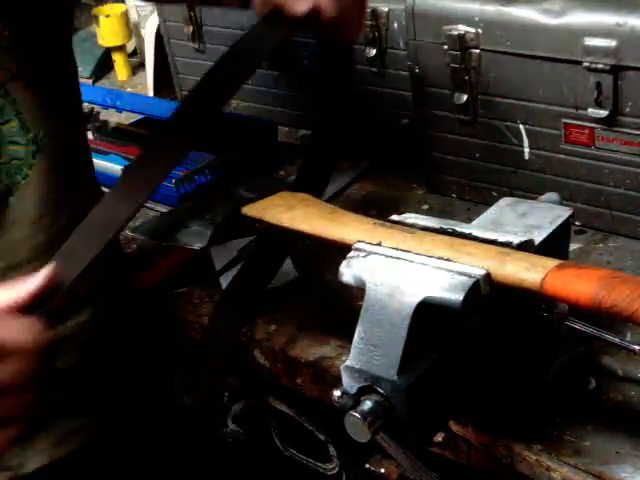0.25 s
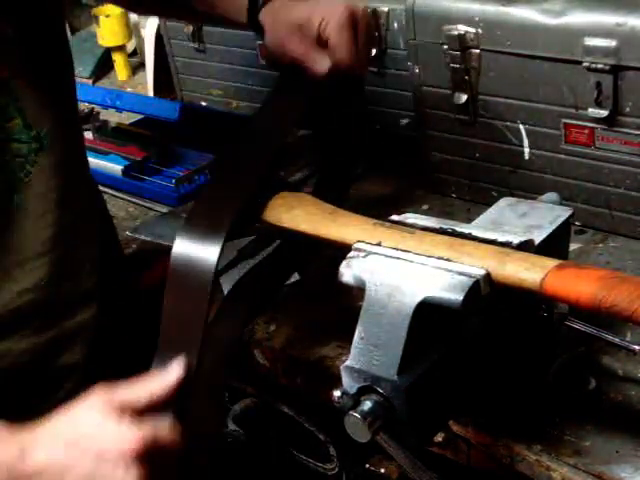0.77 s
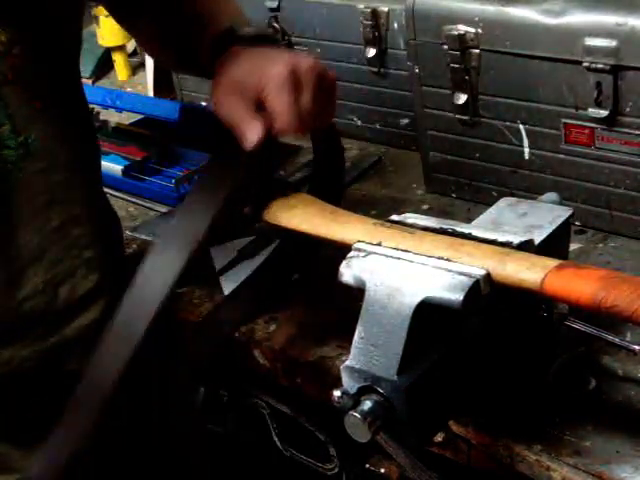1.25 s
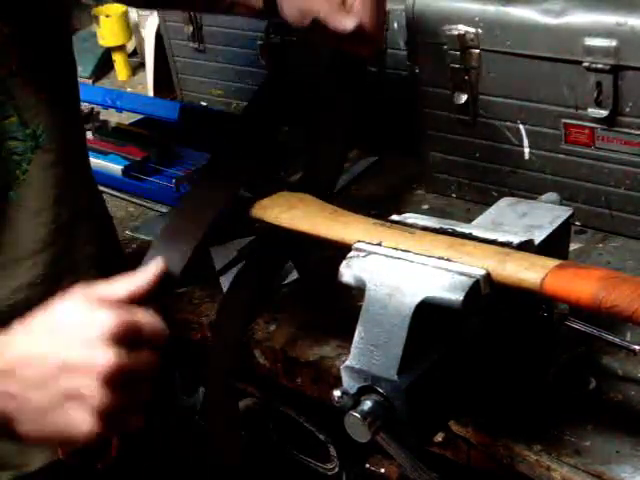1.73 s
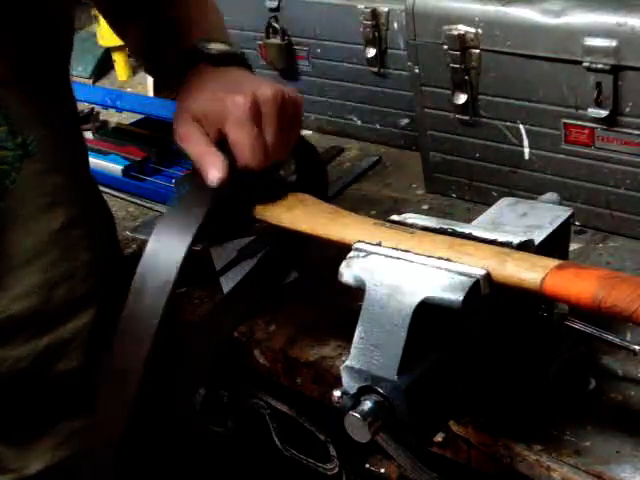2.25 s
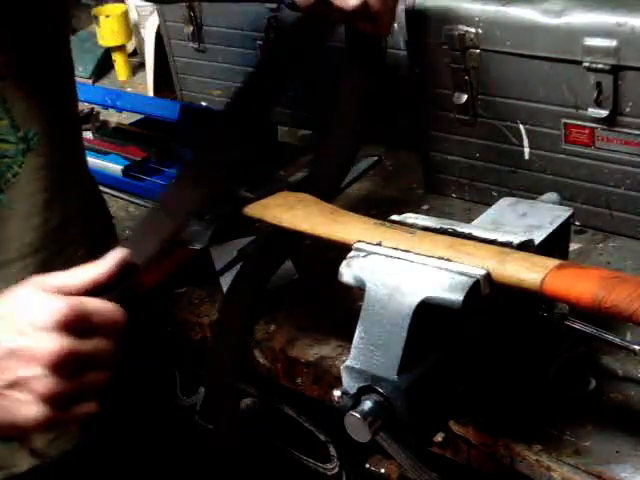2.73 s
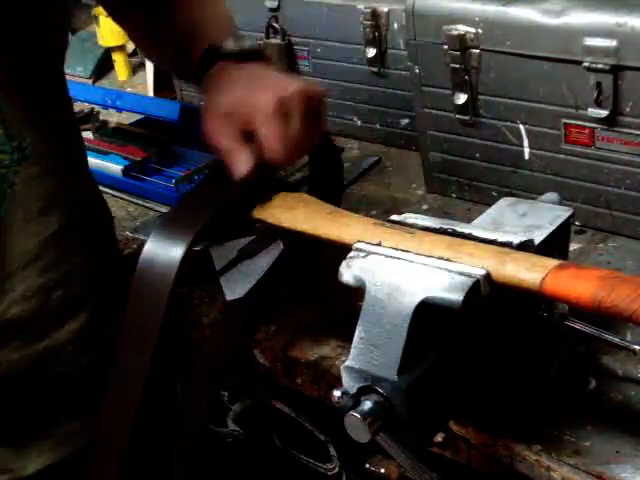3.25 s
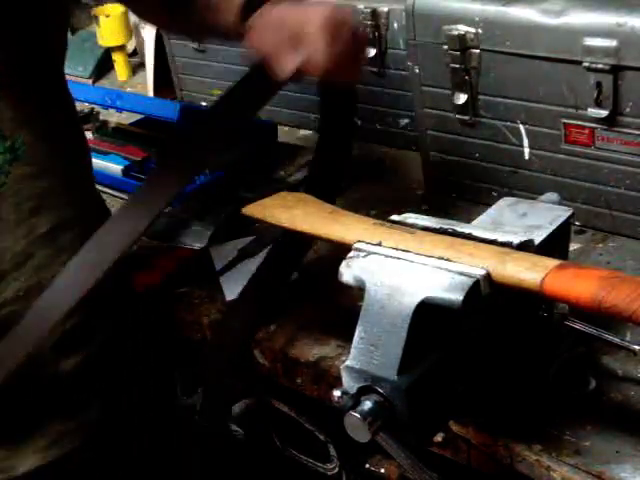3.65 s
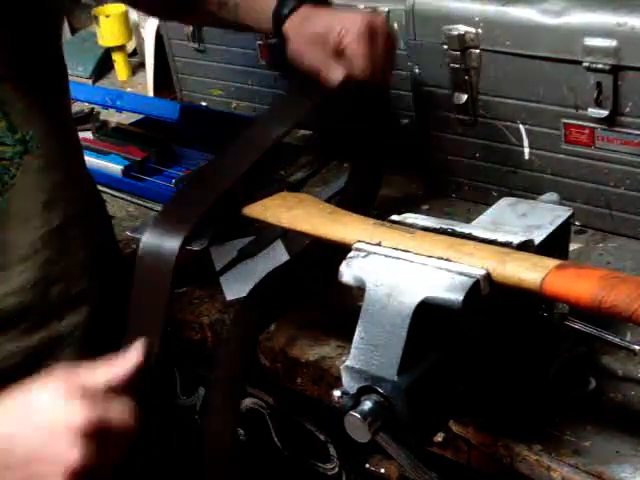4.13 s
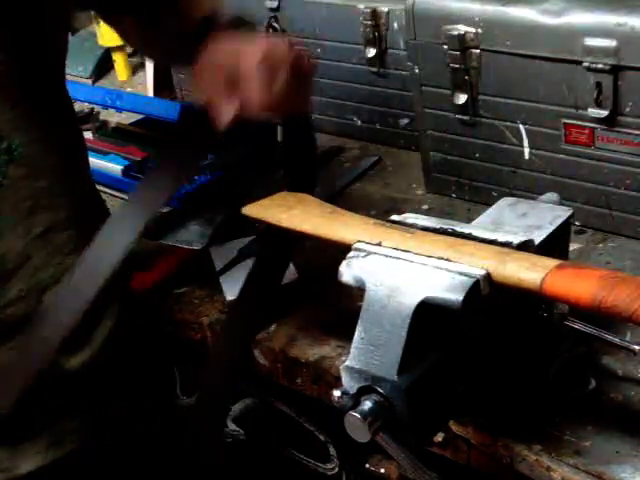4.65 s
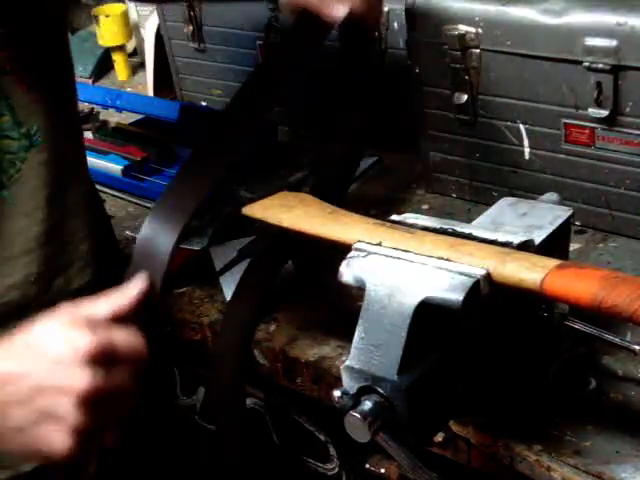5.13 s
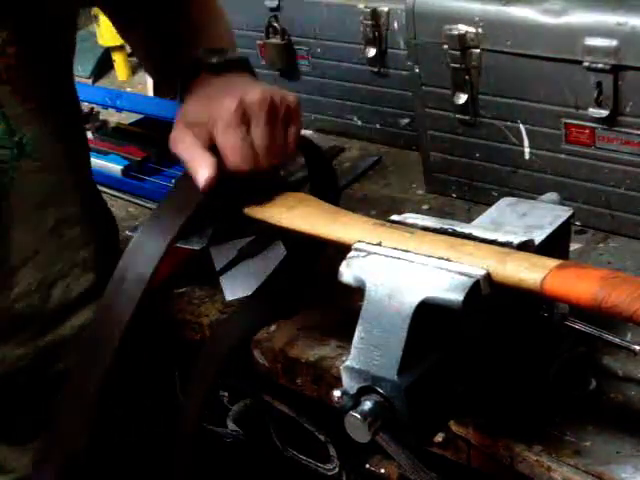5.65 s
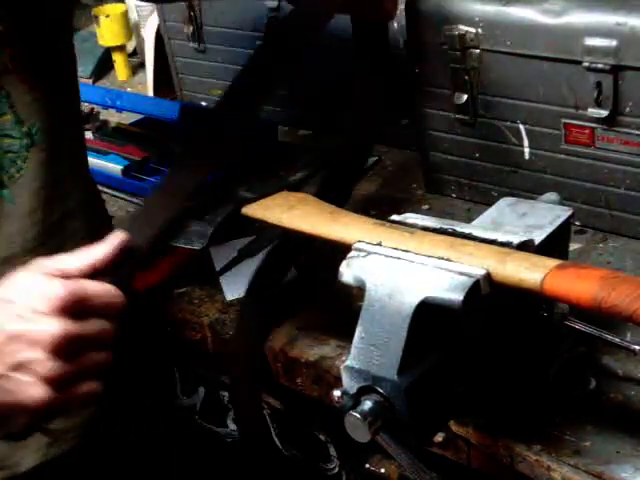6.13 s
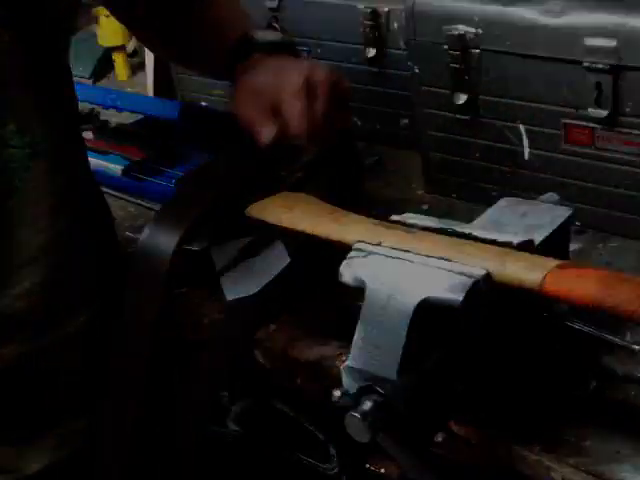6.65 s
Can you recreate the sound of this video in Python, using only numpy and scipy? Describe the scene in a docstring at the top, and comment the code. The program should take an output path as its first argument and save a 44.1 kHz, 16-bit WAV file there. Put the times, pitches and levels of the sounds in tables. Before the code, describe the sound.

A leather belt rubs across a steel axe head held in a vice, close and dry in a quiet workshop. One stroke is under way at the start, and more follow at about 0.8, 1.9, 3.1, 4.2, 5.3 and 6.5 seconds. Each is a half-second hissing rasp with a faint metallic ring. Between pulls the belt slides back with softer, broken rubbing and scuffs, the strongest near 5 seconds. It snaps taut with sharp clicks at about 1.7, 1.8, 2.9, 3.9, 5.0 and 6.1 seconds, the one at 3.9 the sharpest. Short, light knocks on the head come just before the pulls, with a very faint low shudder from the bench. A tiny hollow creak at 6.4 seconds leads into the last stroke. Underneath lie soft room noise, a faint fading hum and barely audible low tones that come and go.

```python
"""A leather belt is drawn over an axe head clamped in a bench vice, in a quiet workshop.
On each pull tiny slips of the grain scrape the steel into ringing. Between pulls the belt
slides back, scuffs, snaps taut and knocks the head, which shakes the bench. A short creak
precedes the last pull. A faint hum fades under the room noise; low drones come and go."""
import sys
import numpy as np
from scipy import signal
from scipy.fft import rfft, irfft
from scipy.io import wavfile

SR = 44100
rng = np.random.default_rng(int(sys.argv[2]) if len(sys.argv) > 2 else 0)


def store_wav(level_fs):
    """Save 16-bit WAV to argv[1]."""
    pcm = np.round(np.clip(np.atleast_2d(level_fs), -1, 1) * 32767)
    wavfile.write(sys.argv[1], SR, pcm.T.astype(np.int16))


N = 303408


def gain_of(db):
    return 10 ** (np.asarray(db) / 20)


def unit_rms(x):
    return x / np.sqrt(np.mean(x ** 2) + 1e-20)


def coloured(x, spectrum):
    """x shaped by (f/Hz, level/dB) points on a log frequency axis, at rms 1."""
    hz, db = np.transpose(spectrum)
    bin_db = np.interp(np.log(np.fft.rfftfreq(len(x), 1 / SR) + 1), np.log(hz + 1), db)
    return unit_rms(irfft(rfft(x) * gain_of(bin_db), len(x)))


def resonate(x, hz, width_hz):
    """One-pole resonance at hz."""
    radius = np.exp(-np.pi * width_hz / SR)
    return 2 * signal.lfilter([1 - radius], [1, -radius * np.exp(2j * np.pi * hz / SR)], x).real


def wander(knots_per_s):
    """Random drift, rms about 1."""
    knots = rng.standard_normal(2000)
    return 1.22 * np.interp(np.arange(N) / SR * knots_per_s, np.arange(2000), knots)


def add(mix, start_s, sound):
    part = mix[round(start_s * SR):][:len(sound)]
    part += sound[:len(part)]


def contact(t, marks_s, levels_db, lift_s):
    """Stroke envelope: rises to the first mark, follows the levels, decays as the belt lifts off."""
    rise = np.clip(t / marks_s[0], 0, 1) ** 0.84
    lift_off = np.exp(-np.maximum(t - marks_s[-1], 0) / lift_s)
    return rise * gain_of(np.interp(t, marks_s, levels_db)) * lift_off


# Taut belt: start/s, bite/s, peak/s, length/s, scrape at bite/dB, at peak/dB, at parting/dB,
# handle/dB, handle change/dB, hiss/dB, ring/dB, ring tilt/(dB/octave); handle, hiss, ring re scrape
PULLS = [(-.45, .1, 0.41, 0.6, -36, -30.5, -44.5, -8, 6, -9, -4, 7),
         (0.758, 0.084, 0.24, 0.52, -36.5, -34, -37.5, -5.5, -2, -16, -5, -2),
         (1.918, 0.13, 0.43, 0.51, -37.5, -32, -35, -11, -10.5, -17, -6, 0),
         (3.055, 0.1, 0.34, 0.51, -34.5, -30.5, -38, -12.5, -7.5, -15.5, -5.5, -0.5),
         (4.155, 0.091, 0.27, 0.52, -36.5, -29, -33, -13, -8.5, -15.5, -8, 1.5),
         (5.284, 0.19, 0.37, 0.49, -32.5, -29, -34, -13.5, -12, -15, -9.5, -0.1),
         (6.456, .11, 0.24, 0.4, -34, -30, -35.5, -13.5, -6.5, -15.5, -10, 3)]
# Slack belt: start/s, rise/s, hold/s, first level/dB, last level/dB, handle/dB, hiss/dB (both re scrape)
SLIDES = [(0.157, 0.047, 0.038, -47.5, -51, -3, -6.5), (0.25, 0.017, 0.11, -56, -61, -2, -6),
          (0.367, 0.084, .11, -44.5, -49, -5.5, -5.5), (0.587, 0.02, 0.038, -48, -49.5, -8, -4.5),
          (1.36, 0.019, .015, -53, -58, 3, -7), (1.568, .008, 0.14, -48.5, -46, -1.9, -15),
          (1.704, 0.014, 0.021, -54, -42.5, -7, -9), (2.496, .02, 0.058, -57.5, -62, 3, -1),
          (2.614, .01, 0.017, -51.5, -64, -2, -8), (2.69, 0.07, .11, -47.5, -45.5, -3.5, -6.5),
          (2.887, 0.013, 0.085, -44.5, -52, -3.5, -7.5), (2.992, .015, 0.053, -52.5, -57, 0, -5.5),
          (3.629, 0.016, 0.031, -45, -46.5, -5.5, -14), (3.863, .01, 0.021, -49, -44, 5, -17),
          (3.918, 0.01, 0.15, -39.5, -50, 0, -4.5), (4.093, 0.017, 0.027, -57, -50, 2, -10),
          (4.713, 0.012, 0.057, -52, -51, 1, -15), (4.824, 0.0089, 0.0092, -49, -62, -0.5, -15),
          (4.861, 0.033, .01, -49, -49, 2.4, -8), (5.04, 0.013, 0.17, -51.5, -52.5, 2.5, -1.5),
          (5.252, .01, 0.026, -55, -57, -9, -5), (5.846, 0.052, 0.051, -40.5, -40.5, -8.5, -14),
          (6.011, 0.043, .015, -47, -44.5, -4.5, -17), (6.157, 0.008, .1, -48, -53, 2.7, -4.5),
          (6.316, 0.035, .015, -52, -51, -7, -8), (6.388, .015, .05, -59, -58, -3, -6)]


def strokes():
    """Pulls and slides set the drive of scrape, handle, hiss and ring, and the tilt of the ring."""
    t = np.arange(0, N / SR, 0.001)
    drive, tilt = np.zeros((4, len(t))), np.zeros(len(t))
    pull_lift_s, slide_lift_s = 0.032, 0.014
    hiss_change_db, ring_change_db, slide_ring_db = -4.1, -4, -10.5
    for start, bite, peak, length, *scrape_db, handle_db, change_db, hiss_db, ring_db, tilt_db in PULLS:
        force = contact(t - start, [bite, peak, length], scrape_db, pull_lift_s)
        along = np.clip((t - start) / length, 0, 1) - 0.5  # contact position on the belt
        drive += force * gain_of([np.zeros(len(t)),
                                  handle_db + change_db * along,
                                  hiss_db + hiss_change_db * along,
                                  ring_db + ring_change_db * along])
        tilt[(t > start) & (t < start + length + 4 * pull_lift_s)] = tilt_db
    for start, rise, hold, first_db, last_db, handle_db, hiss_db in SLIDES:
        force = contact(t - start, [rise, rise + hold], [first_db, last_db], slide_lift_s)
        drive += force * gain_of([[0], [handle_db], [hiss_db], [slide_ring_db]])
    return [np.interp(np.arange(N) / SR, t, row) for row in (*drive, tilt)]


def grain_slips():
    """Tiny slips of the leather grain: dense clicks of uneven size, in clumps."""
    size = gain_of(1.53 * np.minimum(rng.exponential(1, N), 6))
    return unit_rms(rng.standard_normal(N) * size * gain_of(0.87 * wander(74)))


# Rubbed axe head: f/Hz, nominal width/Hz, relative level/dB
STEEL_MODES = [(792, 78, -9.5), (1045, 100, -5), (1330, 37, -16), (1577, 40, -16.5), (1780, 180, -9.5),
               (2037, 60, -14), (2235, 85, -16.5), (2532, 60, -1), (2660, 94, -7), (2820, 41, -16.5),
               (2957, 120, -2), (3184, 91, 1), (3360, 62, -6.5), (3450, 58, -5.5), (4226, 200, -3.5),
               (4700, 72, -4), (4854, 45, -7.5), (5265, 110, -9.5)]


def steel_ring(slips, tilt_db_per_octave):
    """Slips ring the head; the contact wanders along the edge, so each mode's drive varies."""
    ring = np.zeros(N)
    for hz, width_hz, db in STEEL_MODES:
        level_db = db + 2.8 * wander(16) + 1.7 * wander(2.68) + tilt_db_per_octave * np.log2(hz / 2500)
        mode = resonate(resonate(slips, hz, 0.98 * width_hz), hz, 4.9 * width_hz)
        ring += gain_of(level_db) * unit_rms(mode)
    return ring / np.linalg.norm([gain_of(db) for _, _, db in STEEL_MODES])


# Rubbing spectra of edge, handle and airy hiss: f/Hz, relative density/dB
EDGE_SPECTRUM = [(530, -61.5), (900, -36), (1050, -14.5), (1220, -9), (1830, -1.5), (2200, -1.5),
                 (2540, 3.5), (3320, 4.5), (3710, 3.5), (7000, -14), (9100, -19), (15400, -120)]
HANDLE_SPECTRUM = [(88, -39), (150, -42), (193, -15.5), (386, -15), (447, -6), (706, -7), (825, 1),
                   (1060, -4), (1210, -5.5), (1800, -9), (2340, -16), (3960, -120)]
HISS_SPECTRUM = [(2650, -48), (4500, -18), (4810, -4.5), (5060, -13.5), (5430, -6), (7230, -6),
                 (9420, -3.5), (10000, -10.5), (13000, -38), (22000, -120)]


def belt():
    """The same slips sound through edge, handle and air, and ring the steel."""
    scrape_drive, handle_drive, hiss_drive, ring_drive, tilt = strokes()
    slips = grain_slips()
    firmness = np.minimum(scrape_drive / gain_of(-36), 1) ** 0.62  # a light touch hardly rings the steel
    ring = ring_drive * firmness * steel_ring(slips, tilt)
    edge = scrape_drive * gain_of(-2.5 + 1.03 * wander(15)) * coloured(slips, EDGE_SPECTRUM)
    hiss = hiss_drive * gain_of(1.36 * wander(40)) * coloured(slips, HISS_SPECTRUM)
    handle = handle_drive * gain_of(1.05 * wander(25)) * coloured(slips, HANDLE_SPECTRUM)
    return edge + ring + handle + hiss


# Workshop background: f/Hz, relative density/dB
ROOM_SPECTRUM = [(15, -45), (25, -18.5), (53, -15.5), (97, -7), (168, -7.5), (447, -4), (667, -2),
                 (836, -3.5), (924, -6.5), (1730, -8.5), (2400, -11), (3160, -8), (3670, -11), (8820, -15),
                 (10000, -17), (13000, -47), (22000, -120)]


def room_noise(level_db=-52.5):
    """Broad noise that swells slightly."""
    return gain_of(level_db + 2.3 * wander(4.3)) * coloured(rng.standard_normal(N), ROOM_SPECTRUM)


# Course of the hum: t/s, level/dB, f/Hz
HUM_TRACK = [(0.0, -63, 101.9), (0.55, -63.5, 102.1), (1.66, -63, 102.9), (1.9, -62.5, 109.3),
             (2.03, -69, 104.3), (2.63, -75, 98), (2.78, -70, 106.6), (4.66, -73, 103), (6.44, -71, 123),
             (6.88, -78, 117)]


def hum():
    """A fading low tone that wavers in pitch and level."""
    t = np.arange(N) / SR
    marks_s, db, hz = np.transpose(HUM_TRACK)
    pitch_hz = np.interp(t, marks_s, hz) + 1.25 * wander(13)
    tone = np.sqrt(2) * np.sin(2 * np.pi * np.cumsum(pitch_hz) / SR)
    return gain_of(np.interp(t, marks_s, db) + 4.4 * wander(10)) * tone


# Faint tones: start/s, end/s, f/Hz, level/dB
DRONES = [(0, .5, 118.3, -62.5), (.82, 1.352, 134.6, -63), (1.85, 2.3, 139, -73), (4.2, 4.698, 138, -66.5),
          (5.6, 6.05, 138.4, -65), (5.82, 6.85, 216.4, -63)]


def drones():
    """Brief steady tones that fade in and out."""
    out = np.zeros(N)
    for start, end, hz, db in DRONES:
        t = np.arange(round((end - start) * SR)) / SR
        add(out, start, gain_of(db) * signal.windows.tukey(len(t), 0.4) * np.sin(2 * np.pi * hz * t))
    return out


# Struck head and handle: f/Hz, relative level/dB, nominal T60/s
KNOCK_MODES = [(298, -22, 0.094), (464, -17, 0.066), (795, -7, 0.15), (868, -2.5, .05),
               (1140, -10.5, 0.048), (1167, -9, 0.058), (1256, -6.5, 0.046), (1520, -7, 0.036),
               (1783, 2.5, 0.037), (1874, -0.5, 0.016), (2090, -3, 0.027), (2610, -8, 0.029),
               (2830, -5, 0.031), (3240, -3.5, 0.1), (3685, -4, 0.042)]
# Blows on the head: t/s, level/dB, tilt/(dB/kHz), pitch factor, T60 factor, smear/s
KNOCKS = [(0.2838, -27.5, -6.5, 0.95, 0.45, 0.00077), (.7028, -23, -5.5, 1.07, 0.37, 0.012),
          (1.866, -23.5, -5.5, .99, 0.5, 0.0061), (2.981, -19, -10.5, 1.02, 0.7, 0.0039),
          (3.891, -32.5, 1.5, 1.08, 1.3, 0.013), (4.076, -27.5, -5.5, 1.11, 0.42, 0.0054),
          (4.901, -25, -2, 0.87, 0.3, 0.002), (5.221, -25.5, -5, 1.01, 0.63, .011),
          (6.089, -25, -6, 1.02, 0.97, 0.0095), (6.143, -24, -6, 1.2, 0.49, 0.008),
          (6.3736, -25.5, -3.5, 1, 0.59, 0.0054)]


def knocks():
    """Blows smeared by soft leather ring the modes of head and handle."""
    out, t = np.zeros(N), np.arange(12000) / SR
    for start, db, tilt_db_per_khz, pitch_factor, t60_factor, smear_s in KNOCKS:
        ring = np.zeros(len(t))
        for hz, mode_db, t60_s in KNOCK_MODES:
            envelope = gain_of(mode_db + tilt_db_per_khz * hz / 1000 - 60 * t / (t60_s * t60_factor))
            ring += envelope * np.sin(2 * np.pi * hz * pitch_factor * t)
        smear = rng.standard_normal(2000) * np.exp(-t[:2000] / smear_s)
        blow = 0.75 * smear / np.linalg.norm(smear) + 0.55 * signal.unit_impulse(2000)
        add(out, start, -gain_of(db) * signal.oaconvolve(ring, blow))
    return out


# Bench shudders: t/s, level/dB
SHUDDERS = [(0.721, -59), (1.887, -60), (3.004, -67), (3.308, -62), (4.096, -57.5), (4.993, -76),
            (5.236, -63), (6.395, -58)]


def bench(hz=62.2, rise_s=0.023, t60_s=1.5):
    """The shaken bench swells within a few cycles and dies slowly."""
    out, t = np.zeros(N), np.arange(SR) / SR
    for start, db in SHUDDERS:
        envelope = gain_of(db - 60 * t / t60_s) * (1 - np.exp(-t / rise_s))
        add(out, start, envelope * np.sin(2 * np.pi * hz * t))
    return out


# Leather scuffs: t/s, level/dB, centre/Hz, nominal width as a share of the centre, rise/s, T60/s
SCUFFS = [(1.444, -41.5, 3100, 1.2, .002, 0.056), (1.575, -40, 1600, 5.7, 0.0016, 0.18),
          (1.868, -40, 1200, 2.8, 0.0048, 0.23), (2.844, -38, 1800, 0.75, 0.0036, 0.091),
          (3.761, -43.5, 4000, 0.24, 0.0033, 0.057), (3.854, -34, 3900, 1.3, 0.0032, 0.17),
          (4.92, -35, 3020, 1.3, 0.0071, 0.2), (4.958, -26, 3240, 0.96, 0.017, 0.23),
          (5.2, -35.5, 1500, 1.3, 0.014, 0.23), (5.234, -33, 3000, 3.1, 0.0038, 0.08),
          (6.051, -40, 3000, 0.93, 0.006, 0.16), (6.07, -30, 3420, 1.5, .003, 0.092),
          (6.09, -33, 2230, 1.4, 0.003, 0.37)]


def scuffs():
    """Leather scuffs in short bursts of band noise."""
    out, t = np.zeros(N), np.arange(9000) / SR
    for start, db, hz, share, rise_s, t60_s in SCUFFS:
        envelope = (1 - np.exp(-t / rise_s)) * gain_of(db - 60 * t / t60_s)
        band = resonate(rng.standard_normal(len(t)), hz, share * hz)
        add(out, start, envelope * unit_rms(resonate(band, hz, 2.8 * share * hz)))
    return out


# Belt snapping taut: t/s, tick level/dB, slap level/dB, slap centre/Hz
SNAPS = [(1.707, -15, -38, 2270), (1.849, -13.5, -22.5, 2250), (2.879, -11.5, -23.5, 2520),
         (3.894, -8.5, -24, 2290), (5.03, -22, -25.5, 2170), (6.143, -20.5, -23.5, 2350)]


def snaps(twin_delay_s=0.00125, rattle_t60_s=0.028, slap_t60_s=0.051):
    """A bright tick, its louder twin a moment later, a rattle and the slap of leather."""
    out, t = np.zeros(N), np.arange(6000) / SR
    from_peak_s = t - 0.0004
    tick = np.exp(-(from_peak_s / 0.00012) ** 2) * np.cos(2 * np.pi * 7200 * from_peak_s)
    ticks = 0.8 * tick + np.roll(tick, round(twin_delay_s * SR))
    for start, tick_db, slap_db, slap_hz in SNAPS:
        rattle = unit_rms(resonate(rng.standard_normal(len(t)), hz=7700, width_hz=2300))
        rattle *= gain_of(-10 - 60 * t / rattle_t60_s)
        slap = unit_rms(resonate(rng.standard_normal(len(t)), slap_hz, width_hz=940))
        slap *= gain_of(slap_db - 60 * t / slap_t60_s) * (1 - np.exp(-t / 0.004))
        add(out, start, gain_of(tick_db) * (ticks + rattle) + slap)
    return out


def creak(start_s=6.398, gap_s=0.0079, peak_s=0.016, peak_db=-29, t60_s=0.025, sag_hz_per_s=2600):
    """Seven uneven slips swell and fade, ringing short hollow notes that step down in pitch."""
    out, t = np.zeros(N), np.arange(3000) / SR
    for slip, (timing_jitter, level_jitter) in enumerate(rng.standard_normal((7, 2))):
        delay_s = max(gap_s * (slip + 0.091 * timing_jitter), 0)
        db = peak_db - 300 * abs(delay_s - peak_s) + 1.5 * level_jitter
        hz = max(590 - sag_hz_per_s * delay_s, 480)
        envelope = gain_of(db - 60 * t / t60_s) * (1 - np.exp(-t / 0.00061))
        add(out, start_s + delay_s, envelope * np.sin(2 * np.pi * hz * t))
    return out


def walls(x, low_t60_s=0.12, high_t60_s=0.017):
    """Wall reflections: sparse taps of random sign, duller as they die away."""
    taps, t = np.zeros(12000), np.arange(12000) / SR
    slots = np.arange(200, 11980, 20)
    arrivals = slots + rng.integers(0, 20, len(slots))
    taps[arrivals] = rng.choice([-1., 1.], len(arrivals))
    lows = signal.lfilter(*signal.butter(2, 3000, fs=SR), taps)
    tail = lows * gain_of(-60 * t / low_t60_s) + (taps - lows) * gain_of(-60 * t / high_t60_s)
    return signal.oaconvolve(x, tail / np.linalg.norm(tail))[:N]


def scene():
    """Belt and axe head with their reflections, over bench and background; mono."""
    bass_cut = signal.butter(4, 300, "high", fs=SR, output="sos")  # small things radiate no bass
    transients = signal.sosfilt(bass_cut, snaps() + knocks() + scuffs())
    direct = belt() + transients + creak()
    return (direct + gain_of(-16) * walls(direct) + bench() + room_noise() + hum() + drones())[None]


def record(dry, rolloff_hz=10080, band_limit_hz=10691):
    """Two steep low-passes in series cut the top of the band."""
    rolloff = signal.firwin(901, rolloff_hz, window=("kaiser", 5), fs=SR)
    band_limit = signal.firwin(511, band_limit_hz, window=("kaiser", 9), fs=SR)
    rolled = signal.oaconvolve(dry, rolloff[None], "same")
    return signal.oaconvolve(rolled, band_limit[None], "same")


dry = scene()
out = record(dry)
store_wav(out)
```